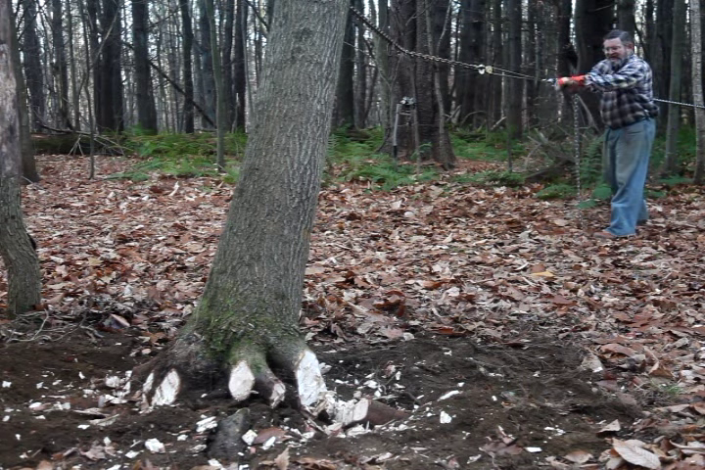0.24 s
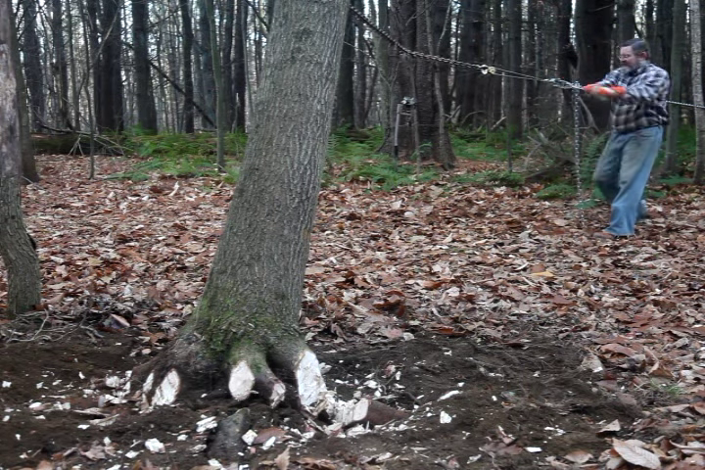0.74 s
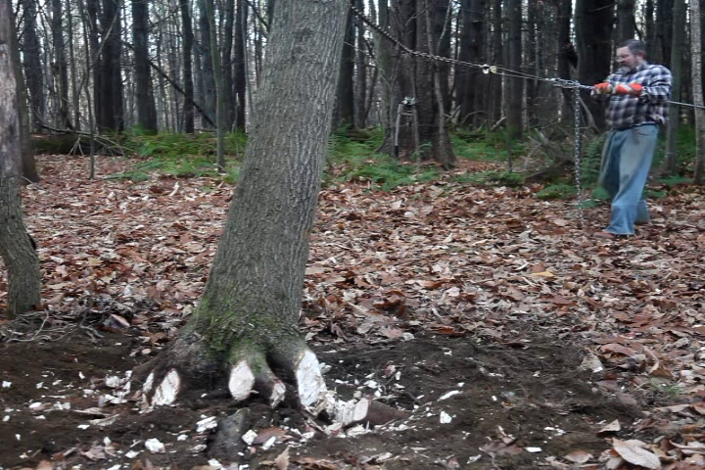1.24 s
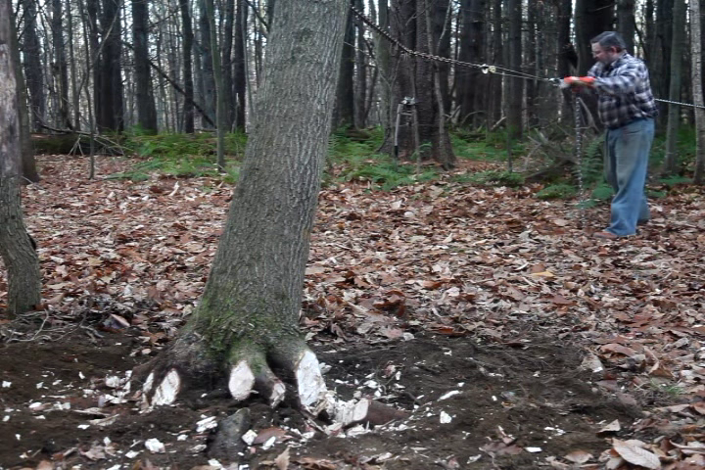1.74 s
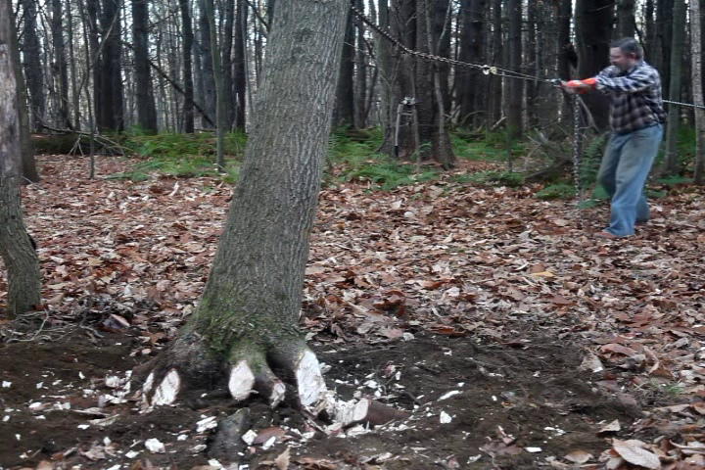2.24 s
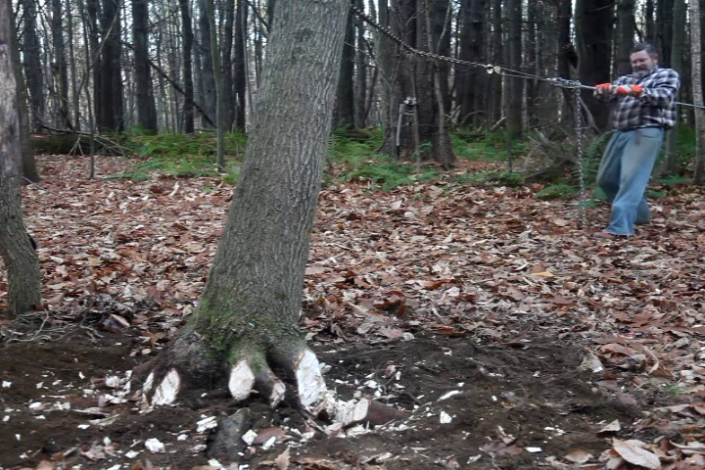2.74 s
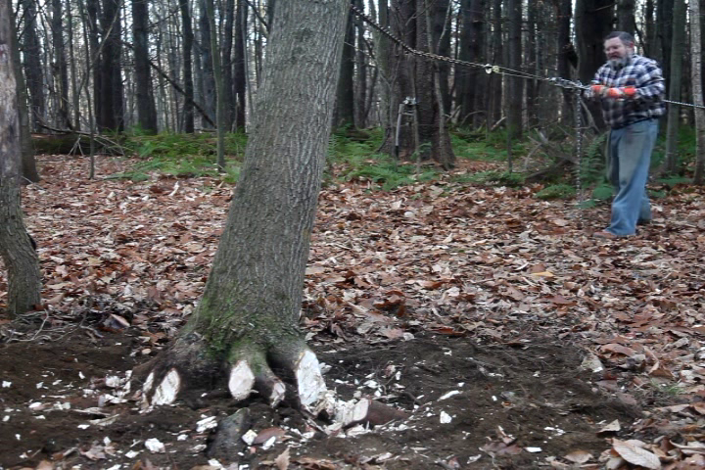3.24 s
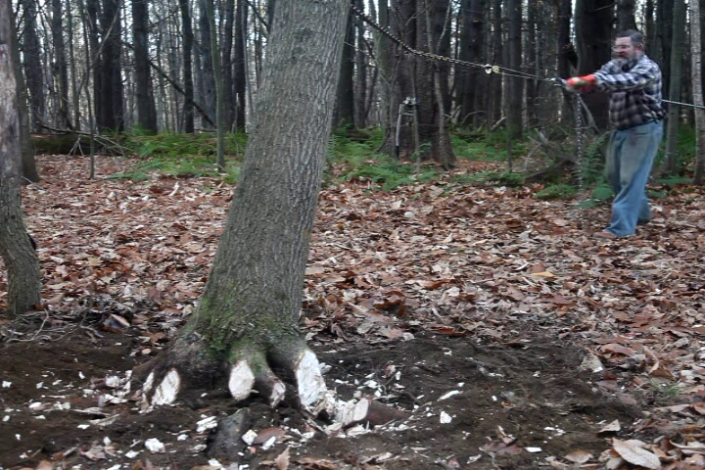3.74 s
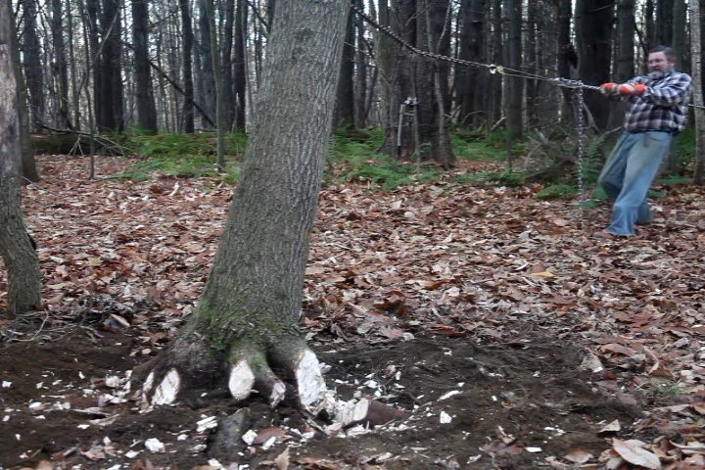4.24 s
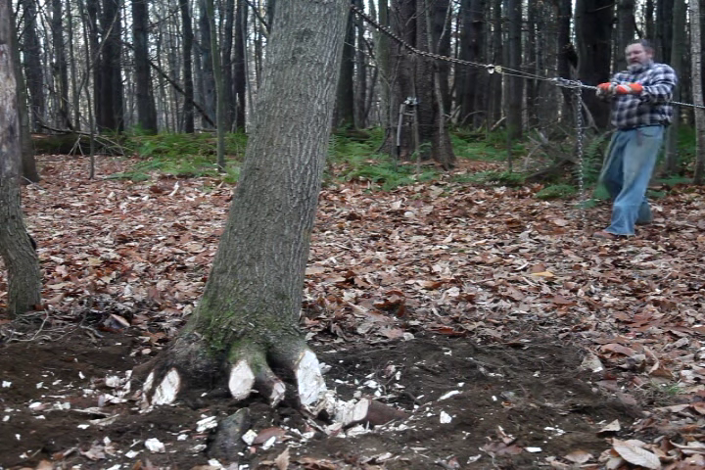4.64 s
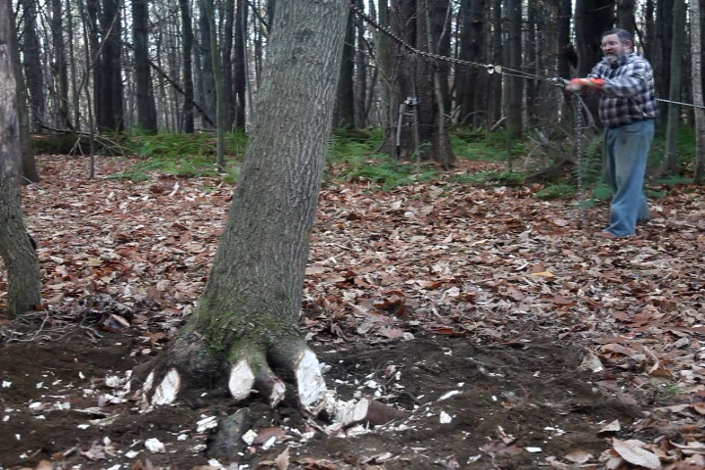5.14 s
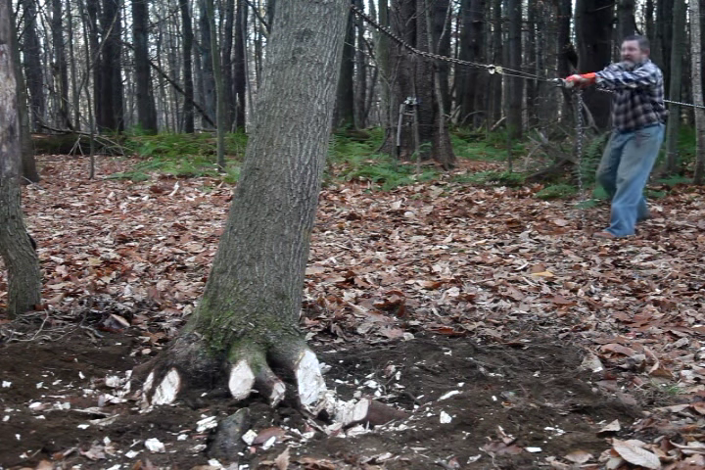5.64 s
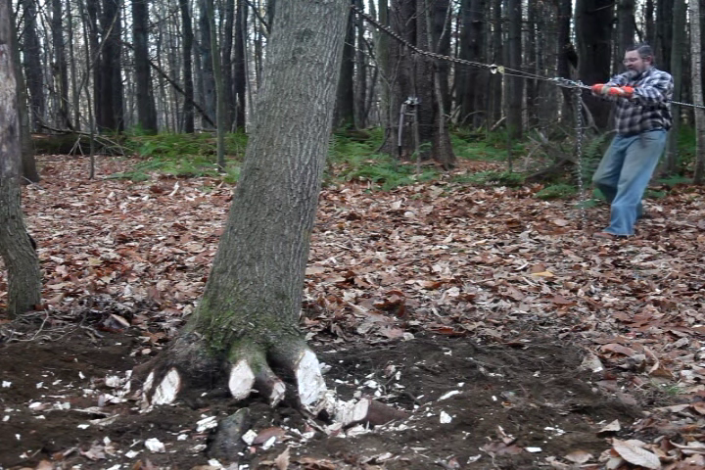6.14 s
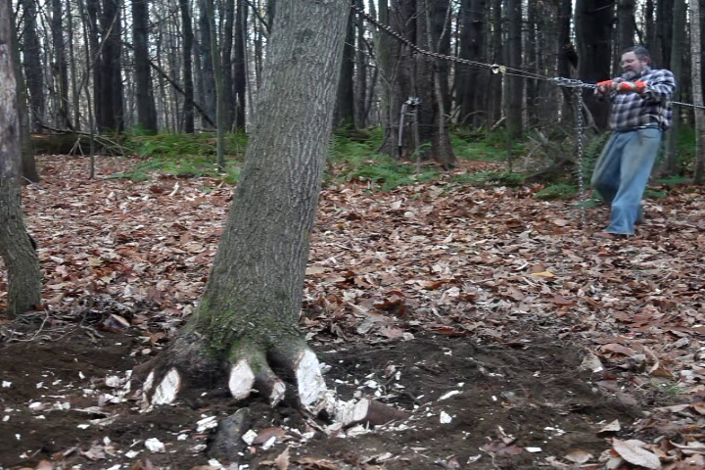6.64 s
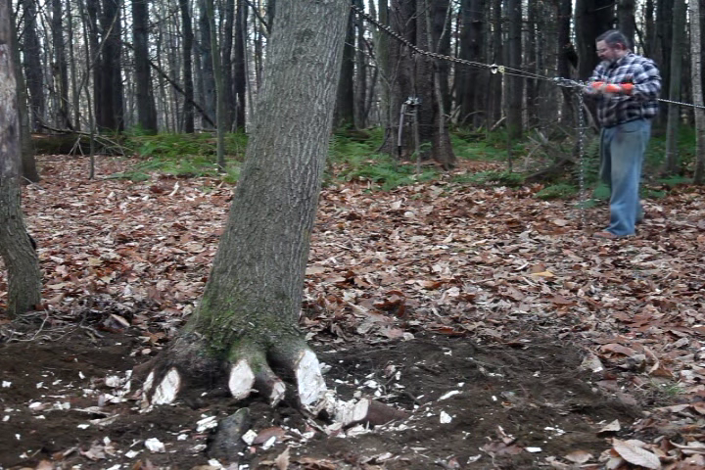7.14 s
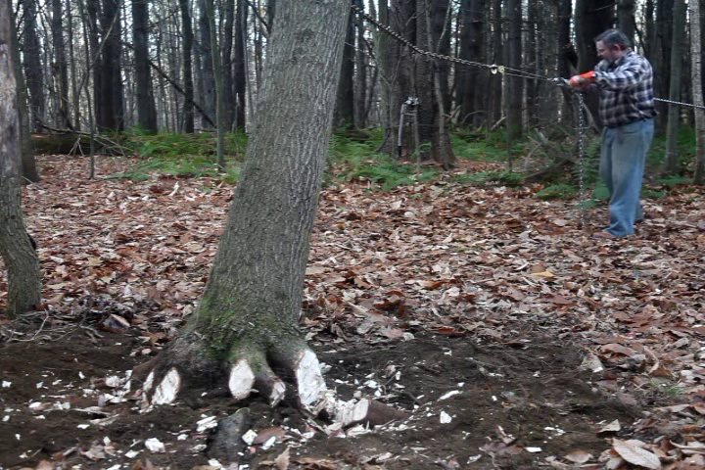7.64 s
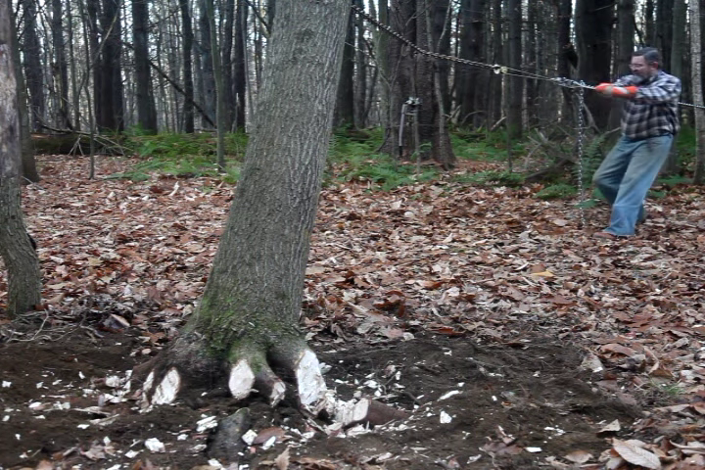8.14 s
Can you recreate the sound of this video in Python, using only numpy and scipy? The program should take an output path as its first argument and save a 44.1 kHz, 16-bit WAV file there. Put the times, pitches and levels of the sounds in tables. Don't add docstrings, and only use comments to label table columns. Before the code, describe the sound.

In a leafy wood, a hand-levered winch gives loud, bright steel clacks in groups of two or three, separated by quieter pauses. Small links tinkle between them, boots rustle dry leaves and twigs snap. Past the middle, a rapid run of slipping notches rattles and knocks the nearby tree trunk woodily. A hard crack follows later. The microphone sits near the trunk, the winch several metres off, with a short scattered tail and low distant hum.

```python
import sys
import numpy as np
from scipy import signal
from scipy.fft import rfft, irfft
from scipy.io import wavfile

SR = 44100
rng = np.random.default_rng(int(sys.argv[2]) if len(sys.argv) > 2 else 0)


def natural_amplitude(level_db):
    exponent = np.asarray(level_db, float) / 20
    return 10 ** exponent


def put_to_file(sound):
    columns = np.atleast_2d(sound).T
    safe = np.clip(columns, -1, 1)
    whole_steps = np.round(safe * 32767)
    wavfile.write(sys.argv[1], SR, whole_steps.astype(np.int16))


N = 370440

# start in seconds, peak in dB, frame in dB, low ring in dB,
# jolt in the trunk in dB.
HOLD = [(0.768, 2, -3, -15, -32), (0.8889, -2.5, -4.5, -22, -42), (0.9939, 1, -11, -46, -46),
        (2.4714, 5.5, -8.5, -26.5, -27), (2.5815, -3, -7, -24.5, -42), (2.704, -4, -6, -31, -34),
        (4.1705, 5, -10.5, -25, -25), (4.2893, 1.5, -15.5, -37, -47), (6.0051, 1.5, -5.5, -41, -21.5),
        (6.2323, 1, -8.5, -19, -57), (6.4542, 0.5, -6.5, -44, -35), (8.2525, 6, -9, -23, -26),
        (8.3567, 0.5, -9, -43, -42)]
DRIVE = [(0.0288, -6, 0, -20, -26.5), (0.2506, -17.5, 11, -7, -29), (1.629, -5.5, -6, -20.5, -22),
         (1.748, -6.5, 0, -14, -25), (1.897, -18.5, 7, -4.5, -16.5), (3.4026, -8, -2, -18, -21),
         (3.5197, -6, -2.5, -20, -27), (3.9516, -24.5, 4, 0, -7), (5.0907, -6.5, -3, -15.5, -23),
         (5.2008, -2.5, -5.5, -18, -26), (5.3608, -8, 2, -13.5, -27), (7.256, -6, -1.5, -25, -22),
         (7.3776, -6, -1.5, -18.5, -24)]
# pitch in Hz, level in dB, t60 in seconds.
HOLD_MODES = [(1300, -9, .015), (1890, -11, .04), (2235, -13, .05), (2290, -13, .05), (2465, -9, .03),
              (3110, -15, .02), (3970, -14, .035), (4500, -13, .035), (5035, -8, .022), (5450, -10, .015),
              (6270, -9, .015), (6870, -1, .03), (7200, 0, .024), (7550, -5, .012), (7890, -3, .015),
              (8300, -5, .012), (8790, -5, .015), (9300, -10, .015)]
DRIVE_MODES = [(1250, -9, .015), (1885, -9, .03), (2110, -8, .05), (2170, -10, .03), (2240, -8, .05),
               (2470, -6, .04), (2600, -10, .04), (3160, -5, .02), (3320, -4, .025), (3920, -12, .03),
               (4500, -13, .03), (5370, -11, .04), (5740, -2, .03), (6300, -9, .025), (6850, -6, .035),
               (7215, 0, .04), (7600, -7, .025), (8080, -7, .025), (9300, -14, .03)]
# delay in seconds, level in dB.
HOLD_REBOUNDS = [(.0008, -9.5), (.0022, -2), (.0038, -6.5), (.030, -40)]
DRIVE_REBOUNDS = [(.0008, -6), (.003, -10), (.0055, -8.5), (.030, -15)]
# pitch in Hz, level in dB, t60 in seconds.
LEVER_MODES = [(2270, -4.5, 0.3), (3980, -6, 0.18), (4500, -2, 0.15), (4490, 5, 0.15), (5560, -12, .12),
               (6870, 2, 0.16), (7050, -1, .09), (7800, -6, .12), (9000, -9, .1)]
# pitch in Hz, level in dB, t60 in seconds.
CABLE_MODES = [(3880, -6, .02), (5800, -5, .02), (6290, -3, .02), (8130, 0, .03), (9040, -10, .02)]
# start in seconds, peak in dB, drum ring in dB, jolt in the trunk in dB.
SLIP = [(4.154, -34.5, -5, 2.5), (5.9257, -2.5, -5, -18), (5.9545, -1, 1, -15.5), (5.9951, 7.5, -5, -24.5),
        (6.056, -5, -4.5, -20), (6.1092, -3, -1.5, -21.5), (6.16, -2, 1.5, -23), (6.198, 1.5, -2.5, -26.5),
        (6.238, -10.5, 7, -17.5), (6.459, -14, -4, -12.5), (6.2693, -2.5, 2, -30),
        (6.3064, -0.5, 0.5, -25.5), (6.355, -4.5, 0.5, -23), (6.3815, -4, 3.5, -22.5),
        (6.4169, -0.5, 2, -26.5), (6.4997, -15.5, 9, -14.5), (6.547, -6.5, 3, -17.5), (8.2217, 1, -4, -17)]
# pitch in Hz, level in dB, t60 in seconds.
SLIP_MODES = [(3100, -8, .02), (3725, -8, .02), (3915, -4, .03), (4115, -6, .03), (4280, -1, .035),
              (4980, -7, .03), (5160, -8, .04), (5800, -10, .03), (6315, 4, .026), (7150, -8, .04),
              (7450, -1, .025), (8085, -5, .045), (8380, -4, .035), (9050, -12, .03)]
# pitch in Hz, level in dB, t60 in seconds.
TRUNK_MODES = [(202, -15, .12), (365, -14, .06), (392, -11, .08), (415, -10, .08), (445, -13, .06),
               (660, -18, .06), (810, -19, .04), (1130, -13, .025), (1370, -5, .022), (1480, -4, .025),
               (1620, -6, .02), (1860, -4, .022), (1930, -4, .022), (2090, -5, .02), (2460, -8, .015),
               (2710, -8, .015)]
# pitch in Hz, level in dB, t60 in seconds.
BENDING = [(200, -13, .1), (404, -4, .075), (436, -10, .06), (662, -13, .12)]
# pitch in Hz, level in dB, t60 in seconds.
TAP_MODES = [(1110, -1, 0.0086), (1500, -7, .012), (2580, -3, 0.015)]
# delay in seconds, pitch in Hz, level in dB,
# t60 in seconds.
TRUNK_KNOCKS = [(0, 1460, -1, 0.029), (0, 2080, -4, 0.011), (.001, 1240, -14.5, 0.12),
                (.002, 2700, -2, 0.046), (.005, 1850, 0.5, 0.011), (.0085, 1500, 0.5, 0.032),
                (.010, 2150, 4.5, 0.017), (.010, 2780, 1, .018), (.0125, 1400, -4, 0.019),
                (.0135, 1900, 6, .035), (.013, 2430, 1, 0.027), (.019, 2700, 4, .025),
                (.024, 1770, -11, 0.018), (.031, 1500, -9.5, 0.018)]
# start in seconds, peak in dB, middle mode in dB, top modes in dB.
LINKS = [(.001, -13, -2, 10), (.082, -11.5, -9, 13), (.597, -46, 6, 5), (.627, -35, -3, 8),
         (.645, -29, -4, 8), (.697, -30, -4, 4), (.71, -27, -4, 6), (.735, -25, -9, 8), (1.462, -25, 6, 12),
         (1.52, -19, 6, 9), (1.546, -19.5, -3, 11.5), (1.588, -17, -14, 14), (1.652, -24, 0, 0),
         (1.669, -13, -8, -5), (1.70, -20, 5, 10), (1.741, -11, -11, 11), (1.779, -23, 5, 0.5),
         (1.814, -17, -4, -3), (1.845, -34, -3, 0), (3.15, -33, -9, -1), (3.193, -20.5, -10, 13),
         (3.261, -25.5, -17, 6.5), (3.325, -24, -9, 7), (3.355, -28, -12, 6), (3.385, -28, -9, 17),
         (4.014, -18, -1, -6), (4.027, -24, -10.5, -3), (4.047, -12, -10, 14), (4.066, -27, 11, 7),
         (4.084, -20, -1, 0), (4.11, -17, -4, 10.5), (4.135, -41, -5, 12), (5.451, -18.5, 4, 10.5),
         (6.95, -14, -10, 12.5), (7.16, -19, -9, 15)]
# pitch in Hz, level in dB, t60 in seconds.
LINK_MODES = [(4770, -17, 0.11), (5050, -3.5, 0.051), (5200, -11, 0.057), (5730, -5, 0.054),
              (7690, -19.5, 0.16), (9500, -33.5, 0.18)]
# start in seconds, level in dB, length in seconds.
GRIND = [(1.377, -43.5, 0.12), (5.54, -53, 0.053), (5.57, -47.5, 0.084), (5.657, -46, 0.066),
         (5.747, -36, 0.045), (6.917, -44, 0.17), (7.963, -33, 0.044), (7.975, -39.5, 0.11),
         (8.022, -44.5, 0.14), (8.083, -36, 0.057), (8.099, -33, 0.022)]
# pitch in Hz, level in dB, t60 in seconds.
GRIND_MODES = [(1970, 0.5, 0.0098), (2210, -20, 0.031), (2430, -0.5, 0.044), (2650, -4.5, 0.046),
               (3470, 6.5, 0.009), (4400, 1, 0.021), (6430, 13, 0.004), (7500, -9, 0.0048)]
# start in seconds, peak in dB, pitch in Hz, t60 in seconds.
PINGS = [(4.732, -40, 2600, 0.022), (5.539, -36, 2630, .035), (5.545, -39, 1930, 0.044),
         (5.575, -42, 4400, 0.091), (5.582, -40, 6250, 0.065), (5.666, -39, 4700, 0.046),
         (5.746, -41, 2300, .06), (5.754, -35, 2560, 0.085), (5.754, -37, 1950, .04),
         (7.497, -35, 2400, 0.033), (3.7, -34, 8300, .05), (3.8, -35, 8400, .04), (4.4, -31, 6800, 0.056),
         (4.047, -31, 5800, .05), (0.2512, -21, 3200, .011), (0.253, -23, 5790, .04),
         (4.293, -31, 1930, 0.06), (4.171, -24, 3000, .05)]
# frequency in Hz, level in dB per Hz.
CRACK = [(530, -52), (900, -32), (2300, -6.5), (3550, -8.5), (5150, -4.5), (6400, -2), (7040, -2.5),
         (9600, -16), (11000, -24), (12200, -23), (16000, -42)]
# start in
# seconds, # peak in dB, centre in Hz, length in seconds.
SNAPS = [(1.3775, -68.5, 5600, 0.06), (1.3815, -28, 6100, 0.012), (1.396, -34.5, 6600, 0.045),
         (1.5474, -37, 5930, 0.011), (2.062, -27.5, 6200, 0.028), (2.177, -33, 4100, 0.074),
         (2.3351, -39, 5750, 0.015), (3.1168, -51, 6110, 0.012), (3.786, -35, 5700, 0.012),
         (3.286, -44, 7800, 0.006), (3.303, -35, 7960, 0.008), (3.3115, -33, 5900, 0.008),
         (3.925, -31, 5540, 0.008), (3.950, -24.5, 4060, 0.034), (4.5705, -29.5, 6640, 0.3),
         (4.7386, -36, 5430, 0.086), (4.947, -41, 2900, 0.034), (4.772, -39, 7800, .015),
         (5.0, -39, 7000, .012), (5.7505, -29, 6400, .03), (5.776, -40, 8000, .012),
         (5.8185, -40, 9800, .008), (5.822, -43, 6800, .08), (6.98, -15.5, 5950, 0.12),
         (7.0743, -13.5, 6600, 0.0061), (7.0817, -20, 6170, 0.025), (7.161, -31, 5300, 0.012),
         (7.5205, -22.5, 5560, 0.013), (7.555, -27, 7500, 0.0073), (7.658, -47, 6900, .008),
         (7.71, -42, 6500, .008), (7.808, -38, 5000, 0.12), (7.827, -40, 8200, .008),
         (7.94, -25.5, 6300, 0.004), (8.004, -20.5, 6100, 0.007), (8.102, -27.5, 6150, 0.03),
         (8.147, -20, 6100, 0.029), (8.1545, -25, 6400, 0.0087), (8.166, -25, 5530, 0.011),
         (8.186, -46, 6000, 0.008)]
# start in
# seconds, # peak in dB, top in Hz, length in seconds.
KNOCKS = [(.94, -27, 830, 0.0095), (.941, -24, 1860, 0.0084), (1.127, -48, 565, 0.0063),
          (1.129, -35.5, 247, 0.02), (1.141, -41, 298, 0.067), (1.152, -41, 171, 0.07),
          (1.41, -42, 330, 0.16), (1.48, -46, 400, 0.16), (1.444, -27, 10000, 0.0079),
          (2.288, -42, 890, 0.043), (2.335, -34, 1280, 0.039), (2.35, -35, 880, 0.043),
          (2.455, -26.5, 2860, 0.081), (2.452, -38, 556, 0.071), (2.526, -34.5, 600, 0.022),
          (2.527, -30, 1950, 0.012), (2.796, -38, 577, 0.014), (4.246, -28, 805, 0.019),
          (4.571, -38, 9200, 0.4), (4.628, -44, 7000, .08), (6.834, -26, 9900, 0.0057),
          (6.977, -13, 8800, 0.033), (7.074, -23, 10000, 0.0054), (7.216, -22.5, 1500, 0.029),
          (7.2165, -5, 4860, 0.0062), (7.217, -11.5, 9100, 0.0022), (8.365, -29.5, 593, 0.013),
          (8.369, -36, 200, 0.039)]
# start in seconds, rustle in dB, hold in seconds.
SWELLS = [(0.0, -44.5, 0.081), (0.64, -53.5, 0.33), (1.62, -46.5, 0.27), (2.44, -48.5, 0.016),
          (3.28, -52.5, 0.26), (3.807, -52, 0.18), (4.232, -42, 0.014), (4.627, -58.5, 0.18),
          (5.247, -53, 0.4), (6.015, -70, 0.01), (6.145, -41.5, 0.55), (6.753, -49.5, 0.31),
          (7.31, -45, 0.25), (8.223, -46, 0.19)]
# frequency in Hz, level in dB per Hz.
RUSTLE_COLOUR = [(590, -2), (1000, -1), (1290, -7), (1400, -3), (2390, -0.5), (2560, 0), (3080, -1.5), (6610, -1),
                 (7700, -1.5), (8700, -9.5), (9920, -20.5), (16000, -37)]
# frequency in Hz, t60 in seconds.
WOOD_T60 = [(1200, 0.59), (3000, 0.57), (7000, 0.46), (12000, 0.33)]
# frequency in Hz, level in dB.
WOOD_COLOUR = [(1000, 4.5), (4000, 4.5), (8000, 2), (10500, 5), (12500, 10.5), (15000, 9.5)]
# time in seconds, level in dB.
DRONE = [(0.0, -60), (.4, -67), (.75, -55.5), (1.3, -52), (2.3, -56), (2.8, -48.5), (3.5, -51),
         (4.25, -52.5), (4.5, -60), (4.9, -61), (5.7, -60), (6.4, -49.5), (6.901, -55), (7.5, -67),
         (8.4, -52)]
# one list of pitches in Hz, one of levels in dB.
ENGINE_HZ = [78, 122, 158]
ENGINE_TONES_DB = [-2.5, -2.5, -10.5]
# frequency in Hz, level in dB per Hz.
HUM = [(12, -53), (20, -22), (74, -1.5), (182, -5), (641, -7), (1290, -15.5), (1400, -11.5), (1850, -20),
       (2130, -14.5), (4540, -29), (5830, -20.5), (7930, -32), (9920, -28), (14700, -33.5), (16000, -41)]
# pitch in Hz, level in dB.
WHINE = [(10740, -89), (11719, -88)]
# start in seconds, drop in dB.
DUCKS = [
    (0.766, 14),
    (2.47, 14.5),
    (4.168, 11),
    (6.002, 12),
    (7.217, 3.5),
    (8.249, 9),
]

CABLE_LEAD_S, SLIP_LEAD_S = 0.00885, .007
LOW_HZ = 3000
LONGEST_RING_S, RING_CYCLES = .35, 480
MODE_SPREAD_DB = 2.5
SOFT_CONTACT_HZ = 11450
CABLE_BOUNCES = [(.001, -2), (.004, 1)]


def rms_one(x):
    return x / np.sqrt(np.mean(x ** 2) + 1e-20)


def at_hz(points, hz):
    known_hz, values = np.array(points).T
    return np.interp(np.log(hz + 1), np.log(known_hz), values)


def coloured(spectrum, size):
    hz = np.fft.rfftfreq(size, 1 / SR)
    white = rng.standard_normal(size)
    return rms_one(irfft(rfft(white) * natural_amplitude(at_hz(spectrum, hz)), size))


def drift(rate_hz):
    knots = rng.standard_normal(1000)
    return np.interp(np.arange(N) * rate_hz / SR, np.arange(1000), knots)


def train(times, gains):
    out, times = np.full(N, 1e-18), np.asarray(times)
    samples = np.clip((times * SR).astype(int), 0, N - 1)
    np.add.at(out, samples, gains * natural_amplitude(gain_drop_db(times)))
    return out


def ring(clicks, hz, t60):
    r = natural_amplitude(-60 / (min(t60, LONGEST_RING_S) * SR))
    w = 2 * np.pi * hz / SR
    return signal.lfilter([0, np.sin(w)], [1, -2 * r * np.cos(w), r * r], clicks)


def fade(clicks, t60, rise=0.00026):
    swell = np.exp(-1 / (rise * SR))
    dying = signal.lfilter([1], [1, -natural_amplitude(-60 / (t60 * SR))], clicks)
    return signal.lfilter([1 - swell], [1, -swell], dying)


def strike(times, level_db, modes, bounces, cycles=RING_CYCLES):
    out = np.zeros(N)
    lag, rebound_db = np.transpose(bounces)
    for hz, mode_db, t60 in modes:
        luck = rng.standard_normal((len(times), len(lag), 2))
        contact_s = times[:, None] + lag * (1 + 0.17 * luck[..., 1])
        contact_db = level_db[:, None] + mode_db + rebound_db + MODE_SPREAD_DB * luck[..., 0]
        out += ring(train(contact_s, natural_amplitude(contact_db)), hz, min(t60, cycles / hz))
    return signal.sosfilt(signal.butter(4, SOFT_CONTACT_HZ, fs=SR, output="sos"), out)


def shaken(force, modes):
    white = rng.standard_normal(N + 999 * len(modes))
    out = 0
    for k, (hz, db, t60) in enumerate(modes):
        out = out + natural_amplitude(db) * ring(force * white[999 * k:][:N], hz, t60)
    return out


def crack(times, level_db, bounces, t60):
    hits = sum(train(times + lag, natural_amplitude(level_db + db)) for lag, db in bounces)
    return fade(hits, t60) * coloured(CRACK, N)


def pawl(rows, modes, bounces, tip_db, ring_db, low_ring_db):
    s, peak_db, frame_db, low_db, _ = np.transpose(rows)
    body_db = peak_db + frame_db
    out = crack(s, peak_db + tip_db, [(-.0022, -18), (.0006, 1)], 0.014)
    out += ring(ring(train(s + 0.0005, natural_amplitude(peak_db - 10.0)), 7130, 0.0048), 8900, 0.0014)
    out += ring(train(s - 0.0012, natural_amplitude(peak_db - 29.5)), 4730, 0.023)
    out += crack(s, body_db - 12.0, bounces[1:], 0.0069)
    out += crack(s, body_db - 14.5, [(.002, 0)], 0.077)
    bright = [mode for mode in modes if mode[0] >= LOW_HZ]
    low = [mode for mode in modes if mode[0] < LOW_HZ]
    out += strike(s, body_db + ring_db, bright, bounces)
    return out + strike(s, peak_db + low_db + low_ring_db, low, bounces)


def lever():
    s, peak_db, frame_db = np.transpose(HOLD)[:3]
    hum_on = fade(train(s, natural_amplitude(peak_db + 1.35 * frame_db - 48.0)), 0.019)
    ahead = strike(s - CABLE_LEAD_S, peak_db - 38.5, CABLE_MODES, CABLE_BOUNCES)
    return ahead + sum(shaken(hum_on, [mode]) for mode in LEVER_MODES)


def slips():
    s, peak_db, ring_db, _ = np.transpose(SLIP)
    drum_db = peak_db + ring_db
    bounces = [(.0012, -2.5), (.0032, -10.5), (.007, -17)]
    out = crack(s, peak_db - 23, bounces, 0.07)
    out += strike(s, drum_db - 24.5, SLIP_MODES, bounces)
    out += shaken(fade(train(s, natural_amplitude(drum_db - 41)), 0.032), SLIP_MODES)
    return out + strike(s - CABLE_LEAD_S, drum_db - 33, CABLE_MODES, CABLE_BOUNCES)


def trunk():
    taps = 0
    for rows in (HOLD, DRIVE):
        s, peak_db, _, _, jolt_db = np.transpose(rows)
        taps = taps + train(s - CABLE_LEAD_S, natural_amplitude(peak_db + jolt_db - 20.5))
    s, peak_db, _, jolt_db = np.transpose(SLIP)
    s, force_db = s - SLIP_LEAD_S, peak_db + jolt_db
    jolts = train(s, natural_amplitude(force_db - 27.5))

    push = natural_amplitude(-9.0) * fade(taps, 0.12) + natural_amplitude(-2.0) * fade(jolts, 0.098) + natural_amplitude(-25.5) * fade(jolts, 0.94)
    bending = shaken(push, TRUNK_MODES[:7])
    for hz, db, t60 in BENDING:
        luck_db = 0.84 * rng.standard_normal(len(s))
        shove = train(s, natural_amplitude(force_db + db - 11.0 + luck_db))
        bending += ring(ring(shove, hz, t60), hz, t60) * 2 * np.e * np.log(1000) / (t60 * SR)

    knocks = shaken(natural_amplitude(10.0) * fade(taps, 0.0046), TAP_MODES)
    knocks += shaken(natural_amplitude(4.5) * fade(jolts, .045, rise=0.0025), TRUNK_MODES[7:])
    for lag, hz, db, t60 in TRUNK_KNOCKS:
        luck_db = 1.2 * rng.standard_normal(len(s))
        knocks += ring(train(s + lag, natural_amplitude(force_db + db - 6.5 + luck_db)), hz, t60)
    return signal.sosfilt(signal.butter(2, 160, "high", fs=SR, output="sos"), [bending, knocks])


def links():
    s, peak_db, middle_db, top_db = np.transpose(LINKS)
    chatter = [(.0005, 2), (.006, -10.5), (.015, -6)]
    out = 0
    for db, modes in [(0, LINK_MODES[:3]), (middle_db, LINK_MODES[3:4]), (top_db, LINK_MODES[4:])]:
        out = out + shaken(fade(train(s, natural_amplitude(peak_db + db - 38.5)), 0.029), modes)
        out += strike(s, peak_db + db - 18.5, modes, chatter, cycles=1100)
    return out


def grind():
    stroke = sum(fade(train([s], natural_amplitude(db - 18)), length, rise=0.0079) for s, db, length in GRIND)
    grains = (rng.random(N) < 3000 / SR) * natural_amplitude(0.75 * rng.exponential(1, N).clip(0, 4))
    return shaken(stroke * rms_one(grains), GRIND_MODES)


def pings():
    return sum(ring(train([s], natural_amplitude(db)), hz, t60) for s, db, hz, t60 in PINGS)


def bursts(rows, down, up, blow, size=4000):
    out = np.zeros(N + size)
    white = rng.standard_normal((len(rows), size))
    n = np.arange(size)
    for (s, peak_db, hz, length), noise in zip(rows, white):
        burst = noise * natural_amplitude(-60 * n / SR / max(length, .002)) * (1 - np.exp(-n / 12))
        burst[9] += blow
        edges = [hz / down, min(hz * up, .45 * SR)]
        burst = signal.sosfilt(signal.butter(3, edges, "band", fs=SR, output="sos"), burst)
        out[int(s * SR):int(s * SR) + size] += natural_amplitude(peak_db) * burst / np.abs(burst).max()
    return out[:N]


def dry_rustle():
    t = np.arange(N) / SR
    rustle = natural_amplitude(-58)
    for s, db, hold in SWELLS:
        rise_db, fall_db = 67 * (s - t).clip(0), 106 * (t - s - hold).clip(0)
        rustle = rustle + natural_amplitude(db - rise_db - fall_db)
    born = rng.random(N) < 500 * natural_amplitude(4 * drift(25)) / SR
    grains = fade(born * natural_amplitude(4.7 * np.minimum(rng.exponential(1, N), 2.5)), 0.032)
    return rustle * coloured([(200, -6.5)] + RUSTLE_COLOUR, N) * rms_one(1 + 0.21 * grains)


def wood(x):
    t = np.arange(SR) / SR
    tail, edges = 0, 150 * 2 ** np.arange(0, 7.1, .5)
    for low, high in zip(edges, edges[1:]):
        middle = np.sqrt(low * high)
        band_pass = signal.butter(2, [low, high], "band", fs=SR, output="sos")
        band = signal.sosfilt(band_pass, rng.standard_normal(SR))
        tail = tail + band * natural_amplitude(at_hz(WOOD_COLOUR, middle) - 60 * t / at_hz(WOOD_T60, middle))
    tail *= np.clip((t - .008) / 0.0029, 0, 1) * natural_amplitude(3.2 * drift(65.0)[:SR])
    return signal.fftconvolve(x, tail / np.sqrt(np.sum(tail ** 2)))[:N]


def engine():
    level_db = np.interp(np.arange(N) / SR, *np.transpose(DRONE))
    out = 0
    for hz, db in zip(ENGINE_HZ, ENGINE_TONES_DB):
        waver_db = 3.0 * drift(13) + 2.4 * drift(2.5)
        phase = 2 * np.pi * hz * np.cumsum(1 + 0.04 * drift(6.7)) / SR
        out = out + natural_amplitude(level_db + db + waver_db) * np.sin(phase)
    return out


def hum():
    t = np.arange(N) / SR
    whine = sum(np.sqrt(2) * natural_amplitude(db) * np.sin(2 * np.pi * hz * t) for hz, db in WHINE)
    return natural_amplitude(-49.5 + 0.42 * drift(1.46)) * coloured(HUM, N) + whine


def gain_drop_db(t):
    drops = []
    for s, db in DUCKS:
        dive = np.clip((t - s - .004) / 0.0016, 0, 1) * db
        recovery = 10.5 * (t - s)
        drops.append((dive - recovery).clip(0) * (t > s))
    return np.max(drops, axis=0)


def scene():
    steel = pawl(HOLD, HOLD_MODES, HOLD_REBOUNDS, tip_db=-14.5, ring_db=-7, low_ring_db=0.54)
    steel += pawl(DRIVE, DRIVE_MODES, DRIVE_REBOUNDS, tip_db=-8.5, ring_db=-12.0, low_ring_db=0.16)
    steel += lever() + slips() + links() + grind() + pings()
    steel = signal.sosfilt(signal.butter(3, [950, 15500], "band", fs=SR, output="sos"), steel)
    bending, knocks = trunk()
    snaps = bursts(SNAPS, down=1.36, up=1.285, blow=0.8)
    near_knocks = bursts(KNOCKS, down=5.35, up=1.12, blow=8.6)
    wet = natural_amplitude(-10.5) * wood(steel + natural_amplitude(4.0) * snaps + natural_amplitude(4.0) * bending + natural_amplitude(4.5) * knocks)
    ridden = steel + bending + knocks + wet + hum() + engine()
    ridden = ridden * natural_amplitude(-gain_drop_db(np.arange(N) / SR))
    return (ridden + snaps + near_knocks + dry_rustle())[None]


def band_limit(x):
    return signal.sosfilt(signal.butter(12, 16110, fs=SR, output="sos"), x)


def record(dry):
    mix = np.clip(dry, -1, 1)
    return band_limit(mix)


dry = scene()
out = record(dry)
put_to_file(out)
```